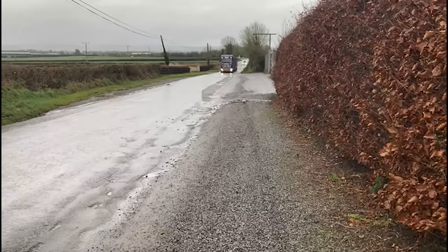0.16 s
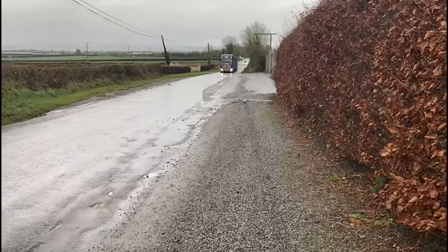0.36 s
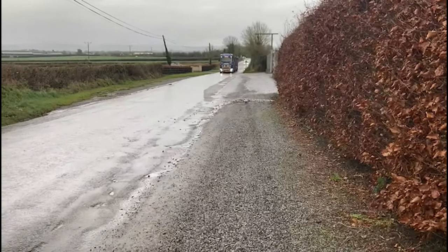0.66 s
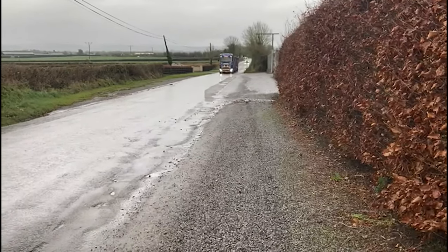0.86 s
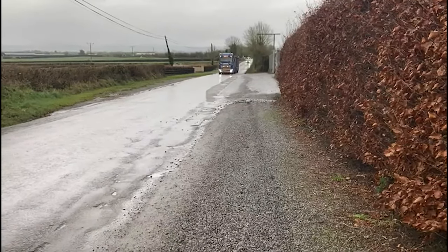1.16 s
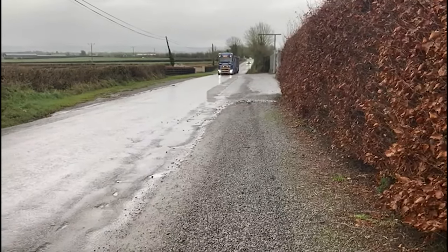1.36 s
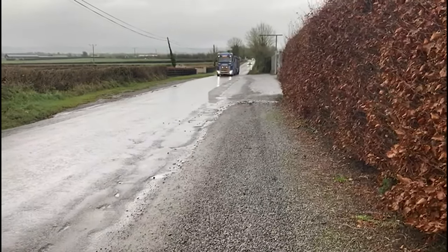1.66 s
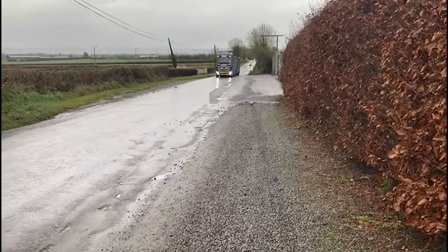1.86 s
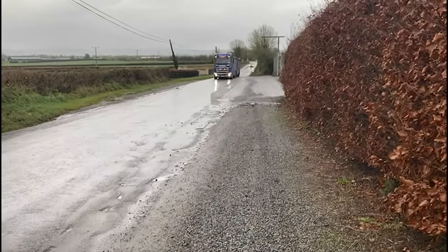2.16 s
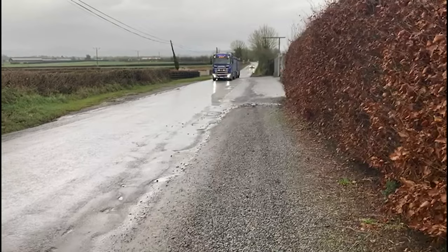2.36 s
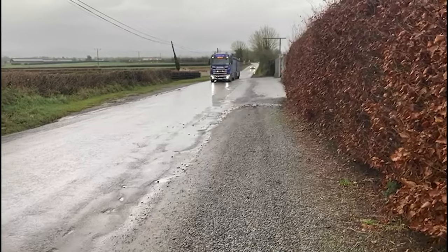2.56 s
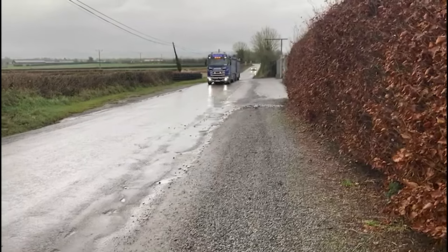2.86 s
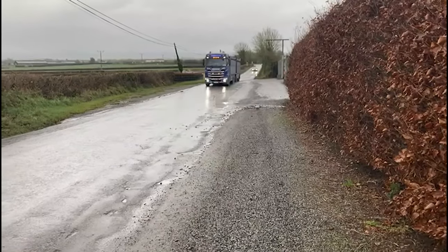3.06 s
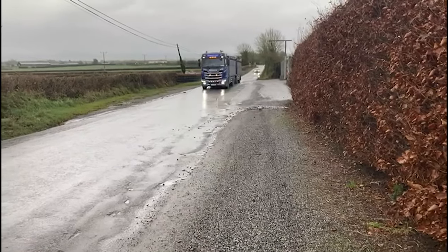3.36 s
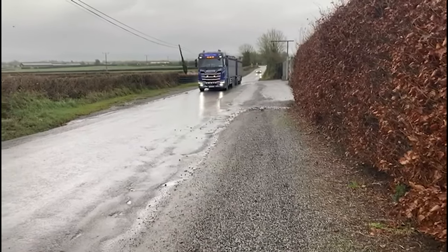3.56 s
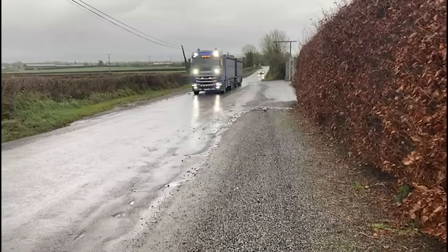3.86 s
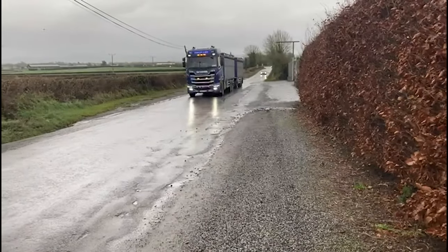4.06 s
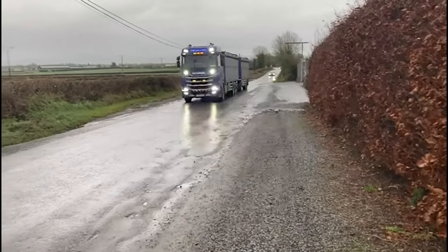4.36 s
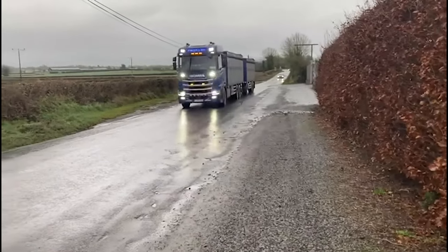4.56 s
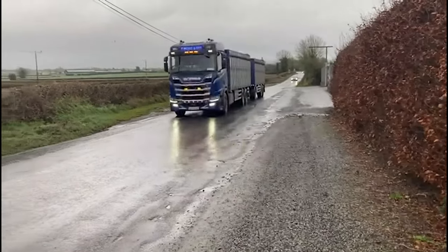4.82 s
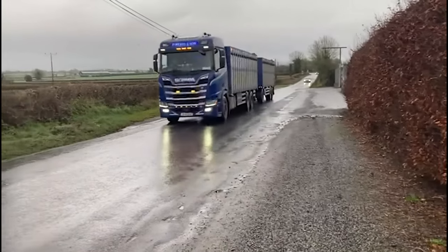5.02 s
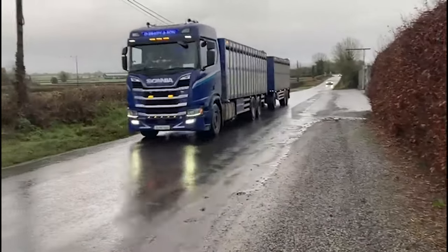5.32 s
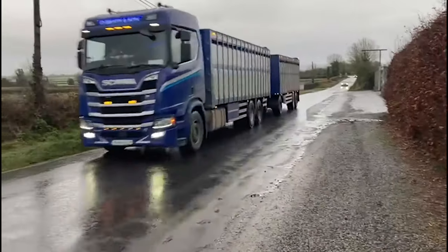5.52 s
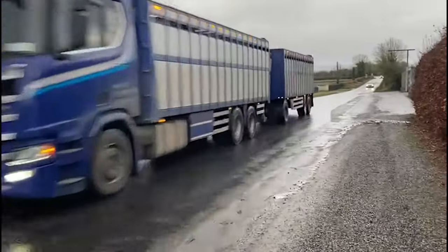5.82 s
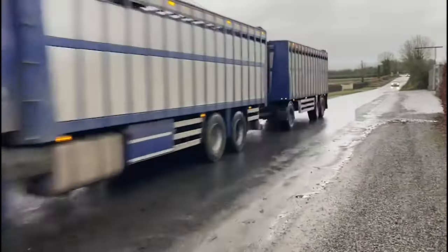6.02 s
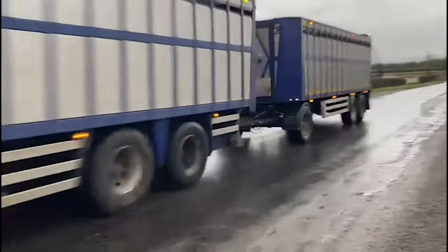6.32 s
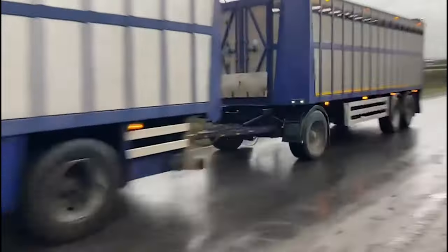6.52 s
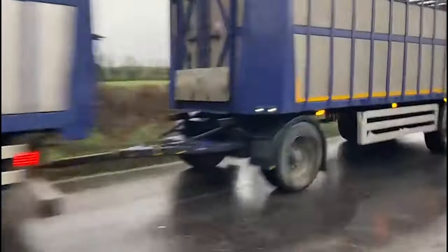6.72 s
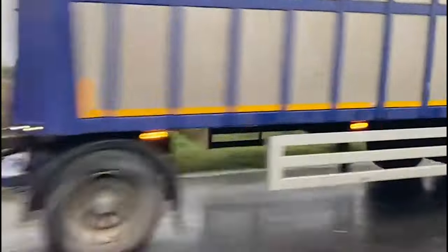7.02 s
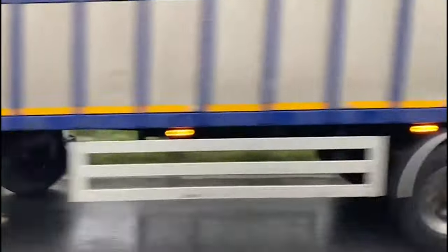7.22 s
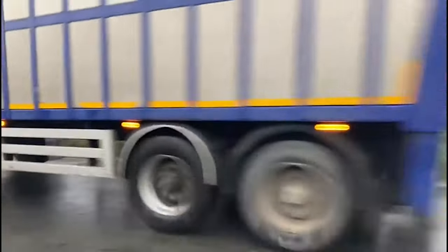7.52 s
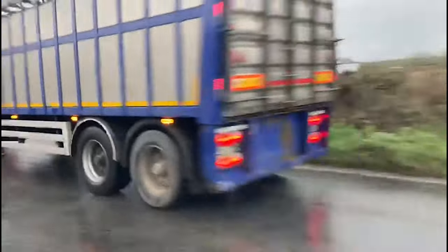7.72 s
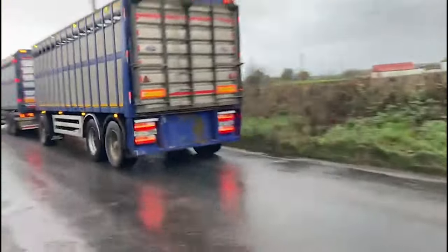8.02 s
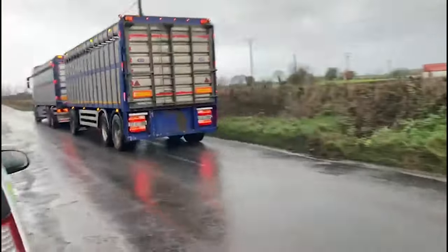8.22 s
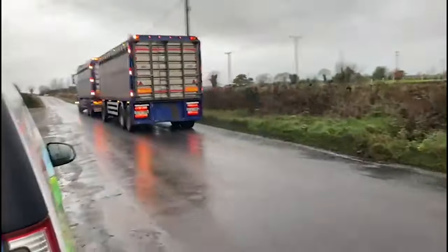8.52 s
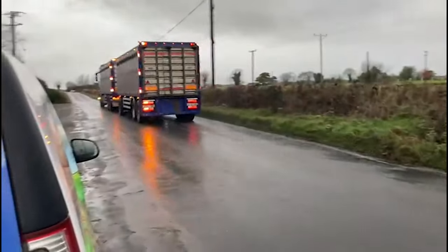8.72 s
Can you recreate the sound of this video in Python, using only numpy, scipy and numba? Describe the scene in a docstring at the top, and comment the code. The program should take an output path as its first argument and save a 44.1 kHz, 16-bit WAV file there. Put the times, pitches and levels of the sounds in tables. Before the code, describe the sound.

A stereo microphone at the roadside hears a distant lorry's steady engine chug grow over several seconds, with low gusts and faint panel thuds. A clipped horn blast sounds, then the engine, roaring tyres and watery hiss peak as the long vehicle passes a few metres away. The empty trailer jolts, the engine eases off and drops in pitch, leaving a wavering drone and fading wet tyre noise.

```python
"""Diesel lorry passing on a wet road

At the kerb, a two-port microphone hears an eight-cylinder lorry with a trailer come up, toot its horn,
pass a few metres off and lift off the throttle. Timed firings ring the exhaust and one part knocks each cycle;
coloured noise makes tyre roar, spray, body jolts and wind, and summed harmonics make the horn.
A gain control ducks loud sound, the horn included."""
import sys
import numpy as np
from scipy import signal
from scipy.fft import rfft, irfft, next_fast_len
from scipy.io import wavfile
from scipy.ndimage import uniform_filter1d, map_coordinates
from numba import njit

SR = 44100
rng = np.random.default_rng(int(sys.argv[2]) if len(sys.argv) > 2 else 0)


def ratio(d):
    """dB to gain"""
    e = np.asarray(d, float) / 20
    return 10 ** e


def transcribe(signal):
    """Save signal, clipped to [-1, 1], as a 16-bit WAV file at the path in sys.argv[1]."""
    frames = np.atleast_2d(signal).T
    limited = np.clip(frames, -1, 1)
    pcm = np.round(limited * 32767).astype(np.int16)
    wavfile.write(sys.argv[1], SR, pcm)


N = 391608


def curves(rows, t):
    """Each column after the time, read at times t."""
    s, *cols = np.transpose(rows)
    return [np.interp(t, s, c) for c in cols]


def along(points, hz):
    """(f/Hz, value) points read on a log frequency axis."""
    f, v = np.transpose(points)
    return np.interp(np.log(hz + 1), np.log(f + 1), v)


def unit(x):
    """Scaled to rms 1."""
    return x / np.sqrt(np.mean(x ** 2) + 1e-20)


def filtered(x, response):
    """x times a complex response of frequency."""
    m = next_fast_len(N + SR // 2)
    return irfft(rfft(x, m) * response(np.fft.rfftfreq(m, 1 / SR)), m)[..., :N]


def resonant(x, modes, column, sign=-1):
    """x through causal resonances, rms 1; sign near 1 leaves dark valleys between them."""
    def response(f):
        total = 0
        for k, mode in enumerate(modes):
            hz, width = mode[:2]
            total = total + sign ** k * ratio(mode[column]) * 1j * f * width / (hz ** 2 - f * f + 1j * f * width)
        return total
    return unit(filtered(x, response))


# when the cab, the exhaust and the last axle come level with the microphone, t/s
CAB_S, EXHAUST_S, TAIL_S = 5.564, 6.334, 7.71
ROAD_SPEED = 9  # m/s


def away(t, first, last, aside):
    """Metres to a part of the lorry that is level with the microphone from first to last s."""
    return np.hypot(ROAD_SPEED * (t - np.clip(t, first, last)), aside)


# the throttle lifts: when, and the time constants by which the engine and the road layers sink, t/s
LIFT_S, ENGINE_SINK_S, ROAD_SINK_S = 6.69, 0.15, 0.53


def level(t, layer, first, last, sink):
    """dB of a layer: it falls with distance and sinks when the throttle lifts."""
    db, doubling_db, metre_db, aside, lift_db = layer
    lifted = 1 - np.exp(-np.clip(t - LIFT_S, 0, None) / sink)
    r = away(t, first, last, aside)
    return db - doubling_db * np.log2(r / aside) - metre_db * (r - aside) - lift_db * lifted


# engine cycles as heard, two crank turns each: t/s, rate/(cycles per s)
CYCLE_RATE = [(0.0, 12.452), (1.0, 12.52), (2.0, 12.643), (3.0, 12.762), (3.5, 12.868), (4.0, 13.05),
              (5.0, 13.31), (6.0, 13.49), (6.3, 13.382), (6.8, 12.979), (7.25, 12.7), (7.55, 11.5),
              (7.95, 10.4), (8.15, 8.9), (8.3, 8.3), (8.88, 8.0)]


def engine_cycles(t):
    """Running count of engine cycles, the integral of their rate."""
    return np.cumsum(curves(CYCLE_RATE, t)[0]) / SR


AIR_DB_PER_M = 0.2246  # at 8 kHz, growing with frequency squared


def rush(colours, level_db, patchy_db, flutter_db):
    """Two unrelated patchy, fluttering noises blend (spectrum, times, shares); lorry distance eats their treble."""
    hz, t, z = signal.stft(rng.standard_normal((2, N)), SR, nperseg=1024)
    patches = uniform_filter1d(rng.standard_normal(z.shape[1:]), size=9, axis=0)
    patches = uniform_filter1d(patches, size=3, axis=1)
    flutter = uniform_filter1d(rng.standard_normal(len(t)), size=4)
    air_db = -AIR_DB_PER_M * np.outer((hz / 8000) ** 2, away(t, CAB_S, TAIL_S, aside=5))
    power = 0
    for spectrum, times, shares in colours:
        colour = ratio(along(spectrum, hz)[:, None] + air_db) ** 2
        power = power + np.interp(t, times, shares) * colour / np.mean(colour, axis=0)
    gain = ratio(patchy_db * unit(patches) + flutter_db * unit(flutter))
    return signal.istft(z * np.sqrt(power) * gain, SR, nperseg=1024)[1][:, :N] * ratio(level_db)


# gusts on the ports: t/s, level/dB
GUSTS = [(1.5, -40.5), (2.3, -29.5), (3.5, -21.5), (4.3, -33.5), (5.5, -70), (7.5, -54), (8.88, -34.5)]
# wind colour: f/Hz, relative level per Hz/dB
BUFFET_COLOUR = [(25, -27), (45, 0), (100, 2.5), (250, -16), (900, -27.5), (2000, -120)]


def wind(t):
    """Gusts buffet each microphone port on its own as low, fluttering noise."""
    return rush([(BUFFET_COLOUR, [0], [1])], curves(GUSTS, t)[0], patchy_db=2, flutter_db=3)


# as the lorry turns its side, then its tail, the road colours cross over, t/s
SIDE_TURN_S, TAIL_TURN_S = [5.3, 5.83], [6.6, 7.13]
ROAR_S = 6.19  # the roar is loudest as the drive axles draw level

# the layer tables below: level abreast/dB, loss per distance doubling/dB, loss over soft ground/(dB per m),
# distance aside/m, loss once the throttle lifts/dB
RUMBLE_LAYER = (-15.5, 1, 0.23, 11.5, 10)
# rumble before the lorry turns its tail, and after: f/Hz, relative level per Hz/dB
RUMBLE_COMING = [(25, -45), (45, -7.5), (65, -3), (90, -9), (200, -15), (260, -18), (330, -32), (900, -120)]
RUMBLE_GOING = [(25, -49), (40, -2), (60, -4), (95, -6), (190, -5.5), (246, -20), (450, -39), (900, -120)]


def rumble(t):
    """Tyres rumble low on the road, as noise that changes colour when the tail turns."""
    colours = [(RUMBLE_COMING, TAIL_TURN_S, [1, 0]), (RUMBLE_GOING, TAIL_TURN_S, [0, 1])]
    rumble_db = level(t, RUMBLE_LAYER, ROAR_S, ROAR_S, ROAD_SINK_S)
    return rush(colours, rumble_db, patchy_db=0.85, flutter_db=0.55)


# extra roar and spray from the drive axles: loudest t/s, half length/s, level/dB
DRIVE_AXLES = (6.15, 0.16, 2.6)


def drive_axles_db(t):
    """dB by which the drive axles lift roar and spray as they go by."""
    loudest, half, db = DRIVE_AXLES
    return db * np.exp(-((t - loudest) / half) ** 2)


# layer columns as for the rumble
ROAR_LAYER = (-16, 4.5, 0.103, 3, 7)
# tyre roar with the lorry ahead, beside and behind: f/Hz, relative level per Hz/dB
ROAR_COMING = [(150, -47), (260, -14), (366, -9), (420, -19), (483, -3), (533, -11.5), (590, -2), (726, -8),
               (909, -16.5), (1300, -11), (2000, -22), (3200, -32), (4200, -61), (7000, -120)]
ROAR_ABREAST = [(150, -50), (280, 5.5), (371, -5.5), (556, -4), (808, -7), (1170, -12.5), (1700, -19),
                (2500, -19.5), (3500, -28.5), (4500, -71), (7000, -120)]
ROAR_GOING = [(150, -47), (280, -10.5), (500, -7), (750, -1), (1270, -10), (1700, -11), (3200, -21.5),
              (4200, -74), (7000, -120)]


def roar(t):
    """Tyre roar, noise in three colours that follow the side turned to the microphone."""
    colours = [(ROAR_COMING, SIDE_TURN_S, [1, 0]),
               (ROAR_ABREAST, SIDE_TURN_S + TAIL_TURN_S, [0, 1, 1, 0]),
               (ROAR_GOING, TAIL_TURN_S, [0, 1])]
    roar_db = level(t, ROAR_LAYER, ROAR_S, ROAR_S, ROAD_SINK_S) + drive_axles_db(t)
    return rush(colours, roar_db, patchy_db=1, flutter_db=0.68)


# layer columns as for the rumble
SPRAY_LAYER = (-32, 3, 0.3539, 5, 0)
# spray colour: f/Hz, relative level per Hz/dB
SPRAY_COLOUR = [(1500, -120), (2200, -5), (3000, 0), (4200, 3.5), (5600, -2), (7500, 4.5), (8300, 7.5),
                (9000, -1.5), (10500, 4.5), (11800, 2), (12200, -60)]
SPRAY_FADE_DB_PER_S = 5.5  # the trailer's tail screens the spray once it has passed


def spray(t):
    """Water sprays off the tread as patchy treble noise."""
    spray_db = level(t, SPRAY_LAYER, CAB_S, TAIL_S, ROAD_SINK_S)
    spray_db = spray_db - SPRAY_FADE_DB_PER_S * np.clip(t - TAIL_S, 0, None)
    return rush([(SPRAY_COLOUR, [0], [1])], spray_db + drive_axles_db(t), patchy_db=1.6, flutter_db=0.6)


# the empty body jolts over potholes: t/s, level/dB, dying time/s
POTHOLES = [(.755, -28, 0.06), (2.242, -26, 0.051), (3.679, -21.5, 0.079), (6.685, -16, 0.066),
            (6.777, -19, 0.027)]
# body panel colour: f/Hz, relative level per Hz/dB
BODY_COLOUR = [(100, -120), (200, 6), (350, 9.5), (700, -6.5), (1500, -27), (2800, -24), (9000, -120)]


def jolts(t):
    """Short dull bangs of the body panels: coloured noise with a quick rise and a dying tail."""
    fade = 0
    for start, db, life in POTHOLES:
        rise = np.minimum((t - start) / 0.0066, 1)
        fade = fade + ratio(db) * (t > start) * rise * np.exp(-np.abs(t - start) / life)
    return fade * unit(filtered(rng.standard_normal(N), lambda f: ratio(along(BODY_COLOUR, f))))


# drone as the lorry coasts away: t/s, level/dB
COASTING_LEVEL = [(6.75, -35), (6.95, -27.5), (7.5, -35.5), (8.0, -31), (8.35, -29), (8.88, -27)]
# what is left of the engine's note: multiple of the cycle rate, relative level/dB
COASTING_NOTE = [(6, -7.5), (8, 0), (10, -9), (16, -10)]


def coasting(t):
    """A wavering low drone of engine harmonics that sinks with the engine speed."""
    rows = np.arange(len(COASTING_NOTE))[:, None] + 0 * t
    # 9 random points a second, smoothly joined
    waver = map_coordinates(rng.standard_normal((len(rows), 100)), [rows, t * 9 + 0 * rows])
    k, db = np.transpose(COASTING_NOTE)[:, :, None]
    phase = 2 * np.pi * k * engine_cycles(t) + .4 * waver[::-1]
    drone = np.sum(ratio(db + 2.2 * waver) * np.sin(phase), axis=0)
    return np.sqrt(2) * (t > COASTING_LEVEL[0][0]) * ratio(curves(COASTING_LEVEL, t)[0]) * drone


# pitch of each horn reed: f/Hz
REED_PITCH = 265.3, 422.5
# each reed: start t/s, end t/s, level/dB, treble lift/(dB per octave)
REED_BLASTS = [(5.178, 5.232, -4.5, 1.7), (5.155, 5.195, -15.5, 2.5)]
# the horn's trumpet: f/Hz, relative level/dB
TRUMPET_COLOUR = [(200, -50), (430, -32), (530, 13.5), (800, -9), (1060, 5.5), (1300, -4), (1600, -10.5),
                  (2100, -10.5), (3000, -19.5), (5000, -33), (8000, -23), (11500, -36)]


def horn(t):
    """Two reeds buzz into the trumpet, blown for under a tenth of a second."""
    out = np.zeros(N)
    for hz, (start, end, db, lift_db) in zip(REED_PITCH, REED_BLASTS):
        k = np.arange(1, 11500 // hz)[:, None]
        span = slice(int((start - .01) * SR), int((end + 0.13) * SR))
        u = t[span] - start
        # the reed's timing wanders (s)
        shake = 1.5e-5 * unit(uniform_filter1d(rng.standard_normal(len(u)), size=90))
        strength = ratio(along(TRUMPET_COLOUR, k * hz) + lift_db * np.log2(k))
        harmonics = strength * np.cos(2 * np.pi * k * hz * (u + shake) + 0.49 * k ** 2)
        buzz = unit(np.sum(harmonics, axis=0))
        rise = np.clip(u / 0.011, 0, 1) ** 2
        swell = rise * np.exp(-u / 0.11 - np.clip(u - (end - start), 0, None) / 0.017)
        # the air supply flutters
        rasp = ratio(1.2 * unit(uniform_filter1d(rng.standard_normal(len(u)), size=150)))
        out[span] += ratio(db) * swell * rasp * buzz
    return out


# exhaust overtones swelling as the angle to the pipe changes, and at 6.47 s and 6.55 s brief bright patches as
# the lorry goes by: # multiple of the cycle rate, loudest t/s, half length/s, level/dB
OVERTONES = [(14, 3.93, .6, -24), (10.06, 4.38, 0.47, -26), (21.9, 5.22, 0.48, -27.5),
             (16, 6.3, 0.17, -17.5), (38, 6.47, 0.054, -19.5), (58.7, 6.55, 0.048, -22),
             (23.97, 6.0, 0.2, -19), (42.7, 6.25, 0.093, -17.5), (21.94, 6.4, 0.16, -22)]


def overtones(t):
    """Sines locked to the engine cycle swell and fade one by one."""
    cycle = engine_cycles(t)
    out = np.zeros(N)
    for (k, loudest, half, db), turn in zip(OVERTONES, rng.random(len(OVERTONES))):
        swell = np.exp(-((t - loudest) / half) ** 2)
        out += np.sqrt(2) * ratio(db) * swell * np.sin(2 * np.pi * (k * cycle + turn))
    return out


# layer columns as for the rumble
KNOCK_LAYER = (-24, 2, 0.46, 4, 45)
# rattle colour: f/Hz, relative level per Hz/dB
RATTLE_COLOUR = [(400, -120), (560, 8), (920, -7), (1300, 2), (2050, -4.5), (3000, -10), (5000, -21),
                 (9000, -120)]
# the knocking part rings: f/Hz, width/Hz, relative level/dB
KNOCK_MODES = [(573, 33, 12), (1270, 270, -7), (1554, 114, -4), (2050, 80, -5), (2580, 240, -16.5)]
# the ring stands out most midway through the approach, around 2.6 s: t/s, level against the knock's rattle/dB
RING_LEVEL = [(.8, -10), (1.7, 4.5), (2.6, 8), (3.2, 2.5), (4.6, -3.5)]
KNOCK_PLACE = .357  # share of the cycle


def knock(t):
    """One part is struck once a cycle: a burst of rattling noise and a ring of its resonances."""
    place = engine_cycles(t) - KNOCK_PLACE
    since = place % 1
    blows = ratio(0.5 * rng.standard_normal(int(place[-1] + KNOCK_PLACE)))
    blow = blows[np.minimum((place + 1).astype(int), len(blows) - 1)]
    burst = blow * (.7 * np.exp(-since / .03) + np.exp(-(since / .17) ** 2) + .25 * np.exp(-since / .45))
    noise = rng.standard_normal(N)

    def rattle(hz):
        return unit(burst * filtered(noise, lambda f: ratio(along(RATTLE_COLOUR, f)) / (1 + (f / hz) ** 2)))
    far, near = rattle(9000), rattle(1500)
    rattling = far + np.interp(t, [5.2, 6.1], [0, 1]) * (near - far)  # duller from the side
    strikes = blow * (np.diff(since, prepend=0) < 0)
    # the same short chatter at every strike
    chatter = rng.standard_normal(SR // 20) * np.exp(-t[:SR // 20] / .011)
    ring = resonant(signal.fftconvolve(strikes, chatter)[:N], KNOCK_MODES, column=2)
    knock_db = level(t, KNOCK_LAYER, EXHAUST_S, EXHAUST_S, ENGINE_SINK_S)
    return ratio(knock_db) * (rattling + ratio(curves(RING_LEVEL, t)[0]) * ring)


# layer columns as for the rumble
THUMP_LAYER = (-10, 2.5, 0.18, 6.5, 23)
BARK_LAYER = (-18.5, 1.5, 0.36, 4.5, 26)
# firings: place in the cycle 0-1, relative thump size, relative bark size
FIRINGS = [(0, 1, .15), (.125, .85, .2), (.25, .25, .1), (.375, .2, .9), (.5, 1.15, .7), (.622, .65, 1),
           (.75, .3, .2), (.885, .25, .55)]
# evenness of the firings: t/s, share 0-1
EVENNESS = [(3.3, 0.01), (4.2, 0.32), (5.1, 1), (5.7, 0.32), (6.6, 0.26)]
# exhaust resonances, low and upper: f/Hz, width/Hz, relative level/dB far off, nearing, at the cab, at the side
PIPE_MODES = [(74, 13.2, -1.5, 4, 1, -1), (102.1, 23, -2, -3.5, -2, -3.5), (136.3, 15.2, -1, 5, 2, -23),
              (176.6, 13.6, -2, 4.5, 6.5, -1), (211.6, 19.4, -14, -8, -9.5, -3),
              (229.8, 17, -14, -11, -15.5, -1.5), (281.5, 35, -24, -20, -8.5, -5.5),
              (324.4, 16, -35, -32, -12, -12)]
BARK_MODES = [(364.8, 12.2, 3.5, -11, -5.5, -10), (479.4, 18, 4.5, 1, 1.5, -4.5), (556, 16, 2, -11, -9, 0),
              (589.3, 21.6, -1.5, 1.5, 0, -1.5), (697, 36, -8.5, -12.5, -10, -1),
              (798, 47, -23, -21, -10.5, -2)]
# when each of those four views holds: t/s
VIEW_TIMES = [1, 3.8, 5.4, 6.4]
# how early each firing starts its thump and its bark (share of a cycle)
THUMP_EARLY, BARK_EARLY = .165, .03


def exhaust(t):
    """Each firing thumps the exhaust pipe; some bark through its upper resonances."""
    cycle = engine_cycles(t)
    even = np.clip(curves(EVENNESS, t)[0], 0, 1)
    place, thump, bark = np.transpose(FIRINGS)
    whole = np.arange(int(cycle[-1]))[:, None]
    luck = rng.standard_normal((len(whole), 3, len(place)))

    def samples(early):
        return np.interp(whole + place - early + .001 * luck[:, 0], cycle, np.arange(N)).astype(int)
    thump_at, bark_at = samples(THUMP_EARLY), samples(BARK_EARLY)
    thumps, barks = np.zeros(N), np.zeros(N)
    # the thumps grow most even about a second before the exhaust passes, then turn uneven again
    thumps[thump_at] = (thump + (1 - thump) * even[thump_at]) * ratio(.9 * luck[:, 1])
    barks[bark_at] = bark * ratio(1.4 * luck[:, 2])
    # the loud half of the cycle also blows turbulent gas through the upper resonances
    gas = np.exp(-((cycle % 1 - .55) / .17) ** 2) * rng.standard_normal(N)
    barks = unit(barks) + .7 * unit(gas)

    def heard(x, modes, sign, soft_hz):
        """The four views in turn, softened above soft_hz."""
        out = 0
        for k, share in enumerate(np.eye(len(VIEW_TIMES))):
            out = out + np.interp(t, VIEW_TIMES, share) * resonant(x, modes, column=2 + k, sign=sign)
        return unit(filtered(out, lambda f: 1 / (1 + 1j * f / soft_hz) ** 2))
    thump_db = level(t, THUMP_LAYER, EXHAUST_S, EXHAUST_S, ENGINE_SINK_S)
    bark_db = level(t, BARK_LAYER, EXHAUST_S, EXHAUST_S, ENGINE_SINK_S)
    return (ratio(thump_db) * heard(thumps, PIPE_MODES, sign=-1.003, soft_hz=420)
            + ratio(bark_db) * heard(barks, BARK_MODES, sign=0.94, soft_hz=880))


# a surface near the microphone returns the treble of the oncoming lorry: delay, strength 0-1, lowest pitch
ECHO_MS, ECHO, ECHO_HZ = 1.54, .5, 1750
# beside the microphone the left port hears first, more so as the lorry moves on (less below 1.6 kHz)
LEAD_MS, LEAD_MS_PER_S = .15, .17
# microphone ports with the lorry ahead, and gone by: f/Hz, left lead/rad
PORTS_COMING = [(20, 0), (1100, 0), (1400, -1.5), (1750, 2.1), (1950, 0.5), (2250, 1.5), (3300, 1.3),
                (3600, -2.5), (4600, 0.45), (5400, 1.5), (6500, 0.5), (7600, 0.28), (8400, 3), (9700, 3),
                (10300, 0.28)]
PORTS_GOING = [(300, 0), (700, 0.1), (1400, 0.5), (1900, 2.25), (2400, 0.3), (3100, 1.5), (4300, 1),
               (5200, 2.5), (6460, 0.9), (7600, -0.8), (8400, 3.5), (9700, 3.5), (10300, 0.36)]
# scattered sound that differs between the ports: f/Hz, level against the shared wave/dB
SCATTER = [(30, -23), (100, -43), (300, -26), (700, -11.5), (1100, -7), (3000, -3.5), (6000, -5),
           (7900, -9), (8500, -30), (9600, -47), (10200, -16), (12000, -37)]


def at_ports(dry, t):
    """The two ports hear one wave with a phase lead between them, plus scattered sound that differs."""
    # a is the shared wave; b has its own road noise under the same engine and horn
    hz, s, (a, b) = signal.stft(dry, SR, nperseg=1024)
    hz = hz[:, None]
    echo = ECHO * np.interp(s, [5.0, 5.8], [1, 0]) * np.interp(hz, [ECHO_HZ, 1.1 * ECHO_HZ], [0, 1])
    a = a * (1 + echo * np.exp(-2j * np.pi * hz * ECHO_MS / 1000)) / np.sqrt(1 + echo ** 2)
    gone = np.interp(s, [7.1, 7.5], [0, 1])
    # a time lead holds below about 5 kHz, weaker in the bass; above, the housing sets the phase
    beside = np.interp(s, [5.3, 5.9], [0, 1]) * (1 - gone) * np.interp(hz, [4500, 6000], [1, 0])
    lead_s = np.clip(LEAD_MS + LEAD_MS_PER_S * (s - CAB_S), 0, None) / 1000
    beside_lead = 2 * np.pi * hz * lead_s * np.minimum(hz / 1600, 1) ** 0.5
    leads = along(PORTS_COMING, hz), beside_lead, along(PORTS_GOING, hz)
    shares = 1 - beside - gone, beside, gone
    turn = sum(share * np.exp(1j * lead / 2) for share, lead in zip(shares, leads))
    turn = turn / (np.abs(turn) + 0.011)
    scattered = ratio(along(SCATTER, hz)) * b
    # the left port is a little louder around 1-2 kHz, and lower down while the lorry is beside
    lean = 0.15 * np.exp(-np.log((hz + 1) / 1600) ** 2 / 0.35)
    lean = lean + 0.091 * beside * np.exp(-np.log((hz + 1) / 500) ** 2)
    # one frame (12 ms) later the scattered sound reaches both ports alike
    mid = turn.real * a + 1.055 * np.roll(scattered, shift=(1,), axis=(1,))
    side = 1j * (turn.imag * a + scattered) + lean * mid
    return signal.istft(np.array([mid + side, mid - side]), SR, nperseg=1024)[1][:, :N]


def scene():
    """Road, body, horn and engine reach the two ports; the wind blows on each."""
    t = np.arange(N) / SR
    road = rumble(t) + roar(t) + spray(t)
    engine = overtones(t) + knock(t) + exhaust(t)
    return at_ports(road + jolts(t) + coasting(t) + horn(t) + engine, t) + wind(t)


@njit
def ducking(over_db, attack, release_db):
    """Gain reduction that rises quickly towards the excess and creeps back."""
    out, held = np.zeros(len(over_db)), 0.
    for i in range(len(over_db)):
        if over_db[i] > held:
            held = held + attack * (over_db[i] - held)
        else:
            held = max(held - release_db, 0.)
        out[i] = held
    return out


# gain control: threshold/dB, attack/s, recovery/(dB per s)
LOUD_DB, GRIP_S, RECOVER_DB_PER_S = -16, 0.015, 9.5


def top_cut(x):
    """Nothing passes above the cut-off."""
    return signal.sosfilt(signal.butter(12, 12900, fs=SR, output="sos"), x)


def record(dry):
    """The microphone loses its deepest bass; gain control listens above the bass; peaks round off."""
    dry = filtered(dry, lambda f: (f / (f - 45j)) ** 2)  # the capsule drops the deepest bass
    dry = filtered(dry, lambda f: f < 11950)  # band limit
    heard = filtered(dry.mean(0), lambda f: f / (f + 350 * -1j))
    power = np.abs(uniform_filter1d(heard ** 2, size=800, origin=399))
    over_db = 10 * np.log10(power + 1e-12) - LOUD_DB
    cut_db = ducking(over_db, 1 / (GRIP_S * SR), RECOVER_DB_PER_S / SR)
    x = dry * ratio(-cut_db)
    rounded = x / (1 + np.abs(x) ** 6) ** (1 / 6)
    return top_cut(rounded)


dry = scene()
out = record(dry)
transcribe(out)
```